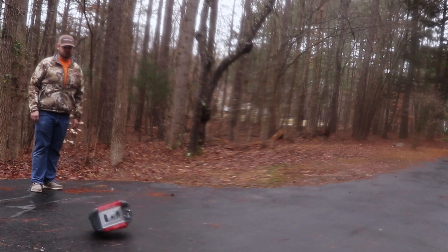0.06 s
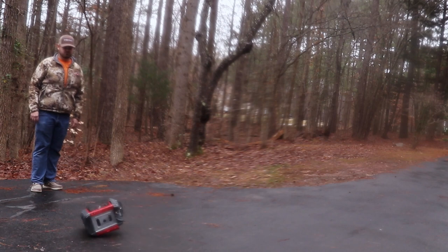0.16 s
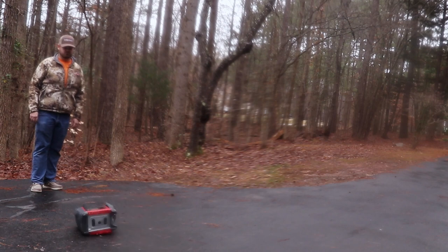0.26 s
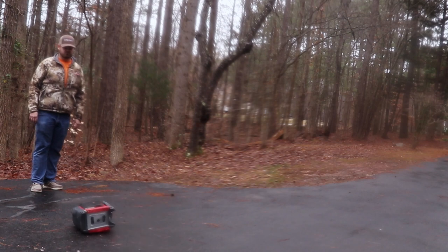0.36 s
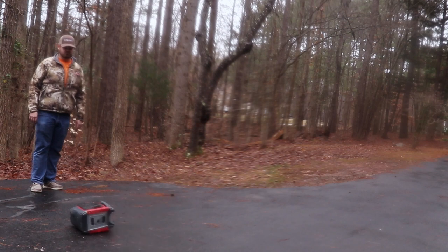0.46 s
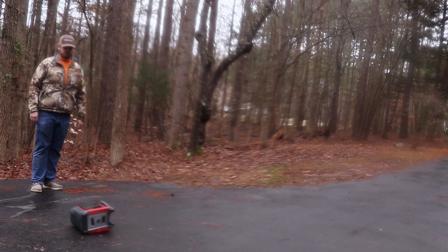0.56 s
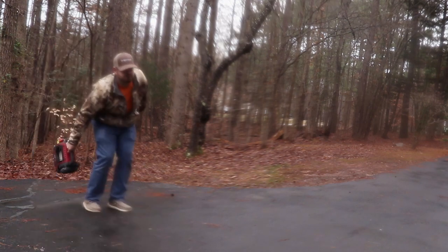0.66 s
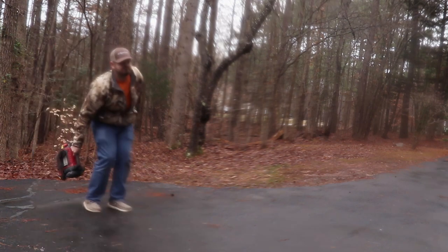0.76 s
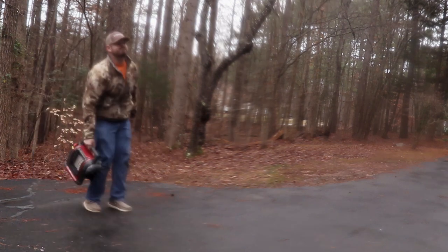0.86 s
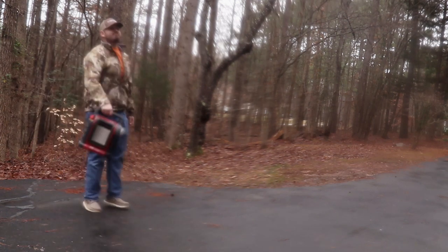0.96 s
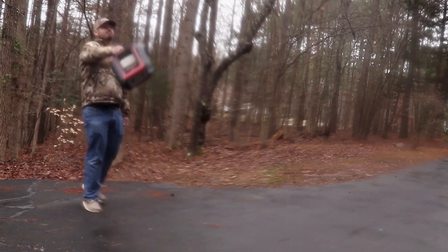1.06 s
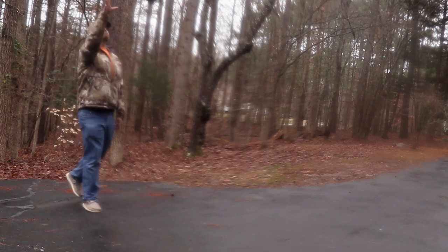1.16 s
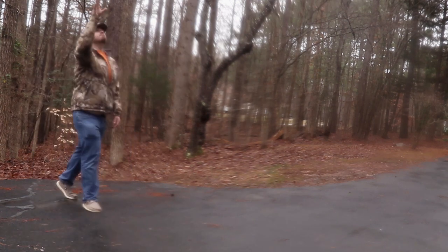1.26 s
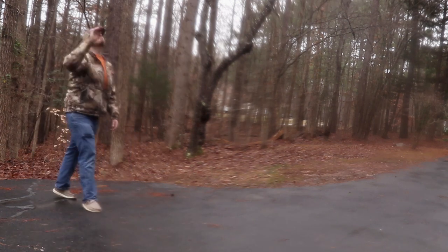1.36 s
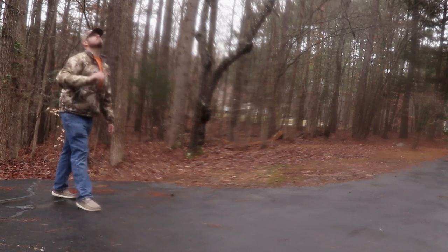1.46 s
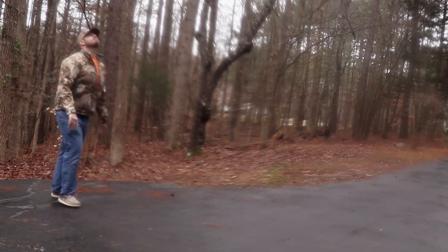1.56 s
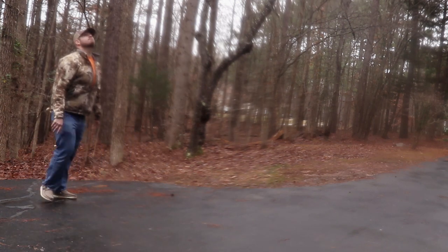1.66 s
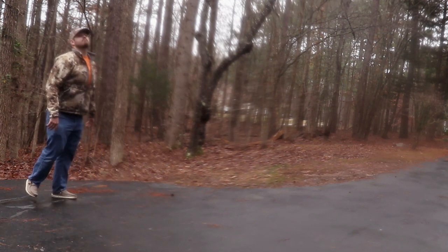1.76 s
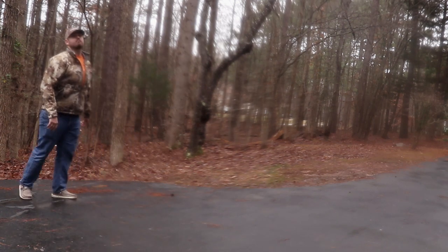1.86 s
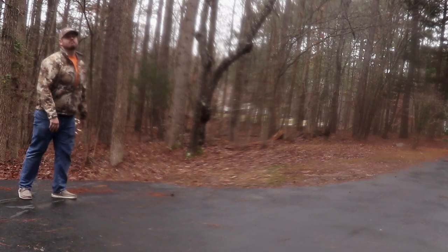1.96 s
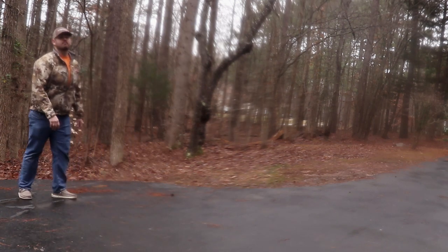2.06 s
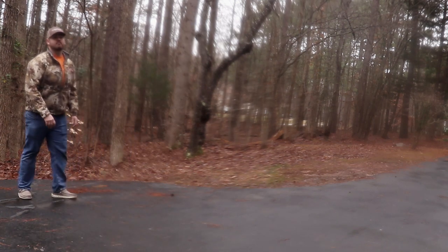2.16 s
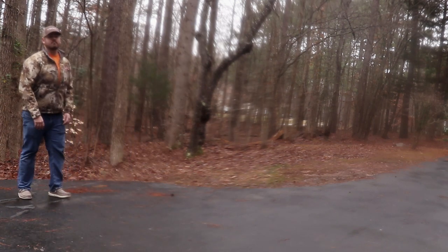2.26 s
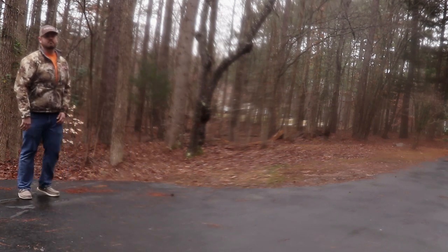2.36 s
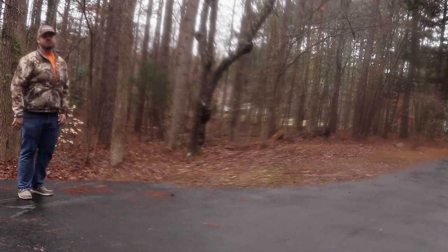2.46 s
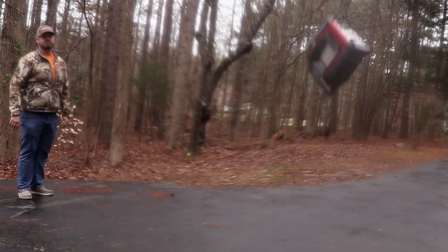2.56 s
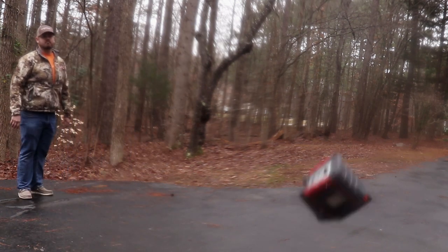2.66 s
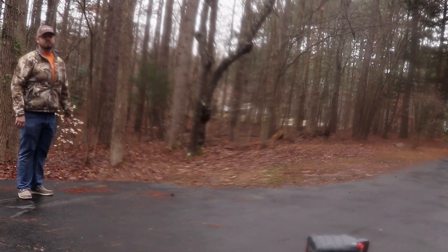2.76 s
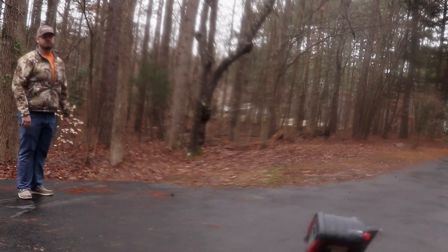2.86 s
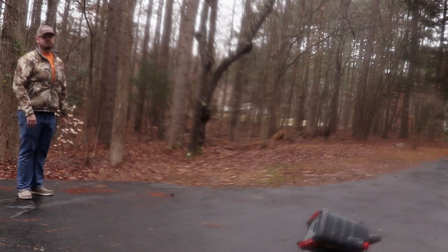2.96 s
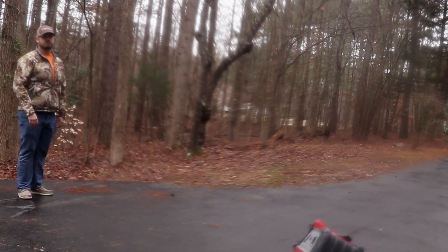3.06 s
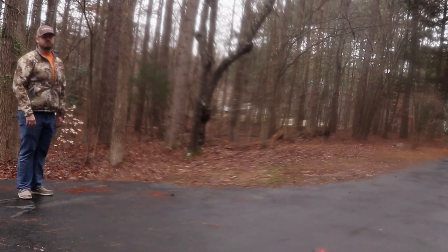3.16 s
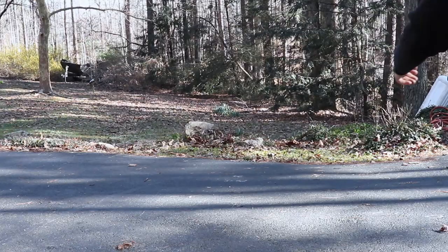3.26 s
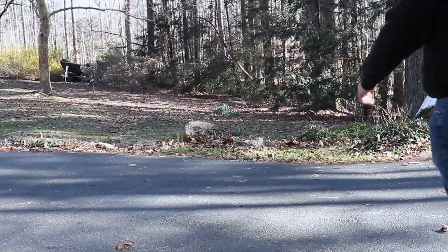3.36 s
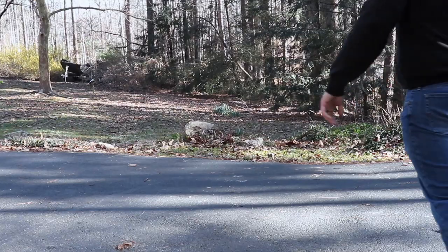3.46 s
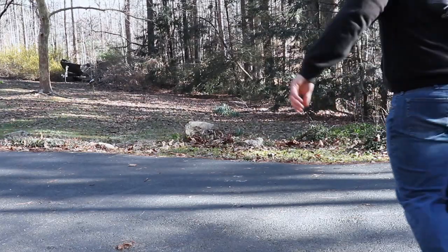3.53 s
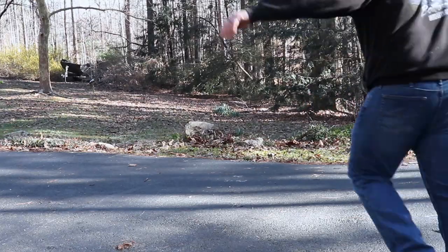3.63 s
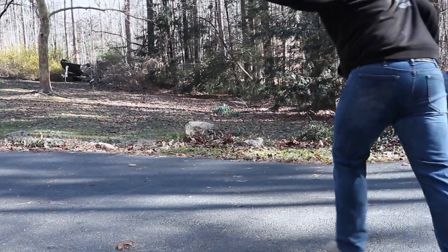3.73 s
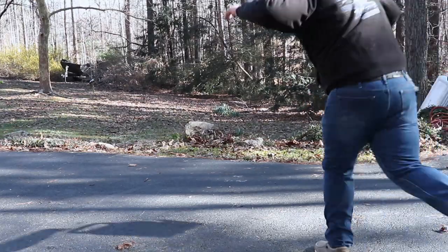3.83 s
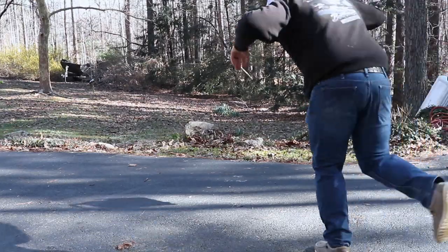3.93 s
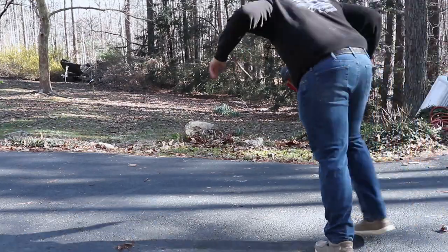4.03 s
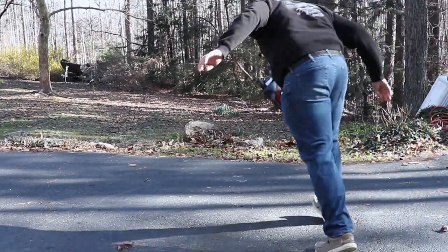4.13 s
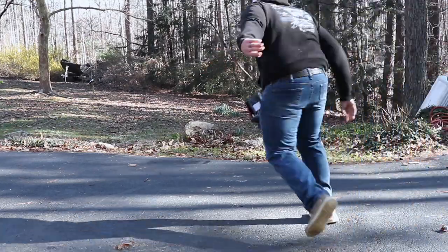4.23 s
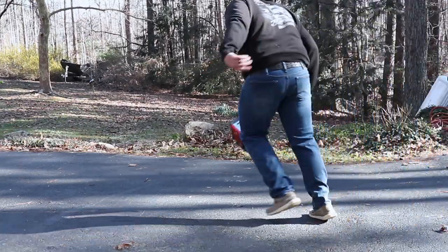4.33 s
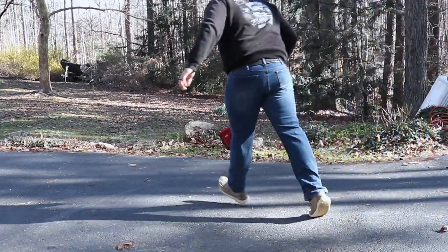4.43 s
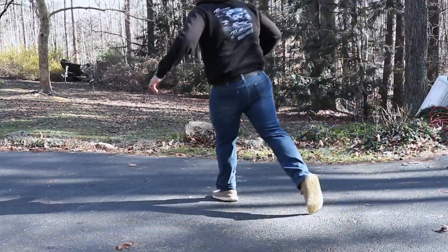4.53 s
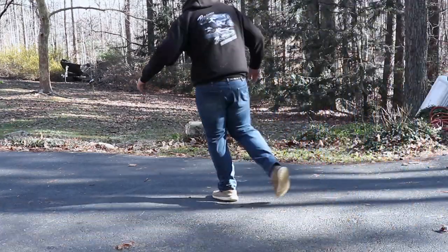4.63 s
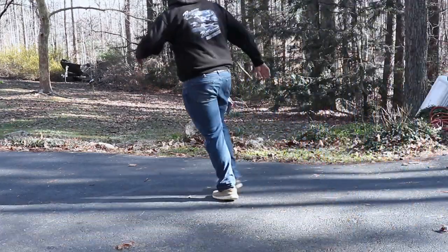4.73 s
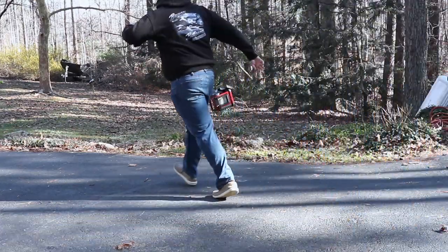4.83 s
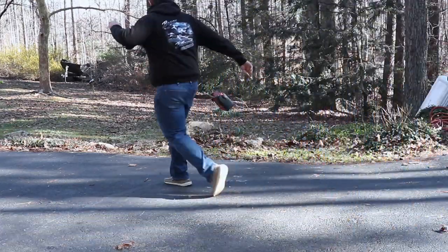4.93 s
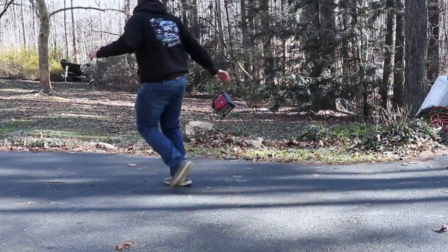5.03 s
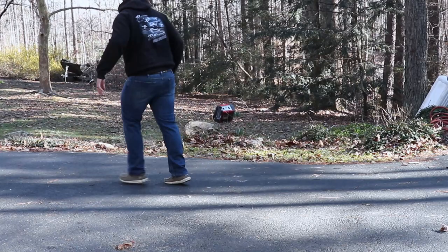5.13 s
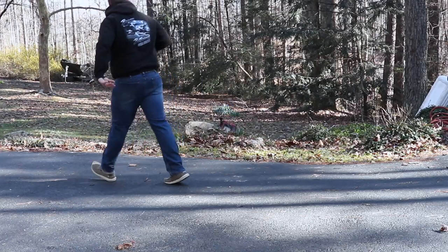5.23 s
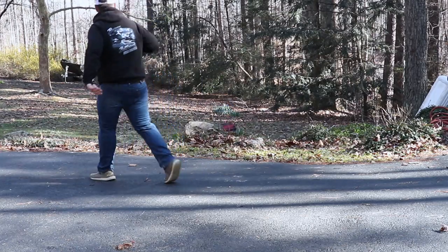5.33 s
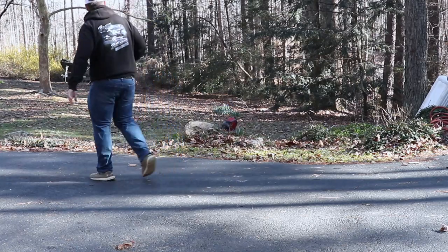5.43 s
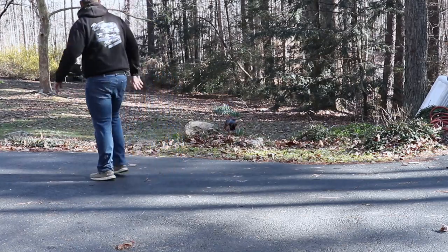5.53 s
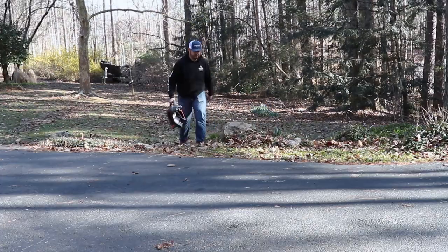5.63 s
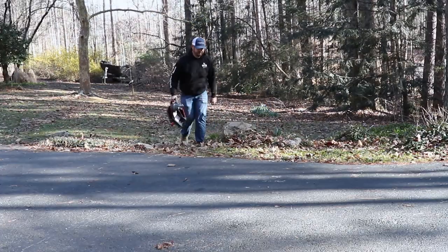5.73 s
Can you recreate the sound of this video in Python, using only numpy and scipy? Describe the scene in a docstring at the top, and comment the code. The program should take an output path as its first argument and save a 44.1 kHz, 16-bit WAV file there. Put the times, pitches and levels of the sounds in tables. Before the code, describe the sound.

Right at the start a sheet-metal heater slams onto asphalt and tumbles in sharp, tinny knocks and rattles, cut off abruptly at about 0.7 seconds. Lighter clanks follow around 1 second as it is picked up. A lull holds only faint shoe scuffs, soft wind thumps mostly on the left of the microphone, and distant traffic. At 2.8 seconds the heater lands with one loud, hard crash and a short rattling echo from the trees. At 3.3 seconds the faint background turns brighter, with a low rumble and slight rustle. From about 3.5 to 4.3 seconds shoes scuff and crack grit among small metal knocks. The heater hits hard at 4.5 seconds and again near 4.8, bouncing and ringing briefly. A last, softer and duller clatter comes around 5.4 seconds, followed by a low puff of wind.

```python
"""A rattle and a hard, tinny slam: a sheet-metal gas heater hits asphalt, thrown several times beside a wood.
Each knock drives a burst of contact noise through its damped panels as it bounces, rattles and skids.
The trees return a hiss of echoes, shoes scuff and crack grit, and wind thumps mainly the left mic.
Far traffic hums underneath; at 3.31 s it turns brighter, gains a low rumble, and a faint rustle joins."""
import sys
import numpy as np
from scipy import signal
from scipy.fft import rfft, irfft, next_fast_len
from scipy.io import wavfile
from scipy.ndimage import uniform_filter1d, map_coordinates

SR = 44100
rng = np.random.default_rng(int(sys.argv[2]) if len(sys.argv) > 2 else 0)


def digitize_waveform(pressure):
    """Quantize a signal to 16-bit integers and store it at the path in sys.argv[1].

    Rows of a 2-D input are taken as channels; values are limited to [-1, 1].
    """
    field = np.atleast_2d(pressure).T
    bounded = np.clip(field, -1, 1)
    quanta = np.round(bounded * 32767).astype(np.int16)
    wavfile.write(sys.argv[1], SR, quanta)


N = 255453
TIME = np.arange(N) / SR
CUT_S, SHIFT_S = 0.663, 3.31  # hard edits: the tails cut off abruptly; the background changes colour


def amp(db):
    """Decibels to gain."""
    return 10 ** (np.asarray(db) / 20)


def unit(x):
    """Scaled to rms 1."""
    return x / np.sqrt(np.mean(x ** 2) + 1e-20)


def along(points, hz):
    """Reads (f/Hz, value) points on a log frequency axis."""
    freqs, values = np.transpose(points)
    return np.interp(np.log(hz + 1), np.log(freqs + 1), values)


def automation(points):
    """Reads (t/s, value) points at every sample."""
    return np.interp(TIME, *np.transpose(points))


def wobble(rate):
    """A smooth random curve, rate knots a second."""
    return map_coordinates(rng.standard_normal(int(N * rate / SR) + 4), [TIME * rate])


def filtered(x, response):
    """x through a complex frequency response."""
    size = next_fast_len(x.shape[-1] + 2048)
    return irfft(rfft(x, size) * response(np.fft.rfftfreq(size, 1 / SR)), size)[..., :x.shape[-1]]


def resonance(hz, centre_hz, width_hz):
    """One damped mode, gain 1 at its centre."""
    return 1j * hz * width_hz / (centre_hz ** 2 - hz * hz + 1j * hz * width_hz)


# Stereo image of scattered sound: f/Hz, left-right correlation
DIFFUSE_IMAGE = [(60, 0.33), (290, 0.35), (640, 0.94), (1400, 0.25), (3100, 0.035), (15000, 0.14)]
def noise_bed(spectrum, patchy_db, image=DIFFUSE_IMAGE):
    """Stereo noise of rms 1, mottled with patches of random gain in time and frequency."""
    def mid_side_eq(hz):
        angle = np.arccos(np.clip(along(image, hz), -1, 1)) / 2
        return amp(along(spectrum, hz)) * [np.cos(angle), np.sin(angle)]
    cells = signal.stft(rng.standard_normal((2, N + SR // 10)), nperseg=256)[2]
    patches = uniform_filter1d(uniform_filter1d(rng.standard_normal(cells.shape[1:]), 4, 0), 6, 1)
    mottled = signal.istft(cells * amp(patchy_db * unit(patches)), nperseg=256)[1][:, :N]
    mid, side = filtered(mottled, mid_side_eq)
    return unit(np.array([mid + side, mid - side]))


# Panel modes of the heater: f/Hz, width/Hz, level/dB
PANEL_MODES = [(470, 70, -7), (900, 150, -1), (1150, 90, -9), (1620, 100, -6), (1930, 120, -2),
               (2550, 120, -7), (3050, 130, -2), (3310, 70, -5), (3750, 90, -8), (4220, 80, -6)]
def casing(hz, direct_db, scatter_db):
    """Sheet-metal colour: panel modes beside a direct path, their strengths randomised by scatter_db."""
    return amp(direct_db) + sum(
        (-1) ** k * amp(db + scatter_db * rng.standard_normal()) * resonance(hz, centre, width)
        for k, (centre, width, db) in enumerate(PANEL_MODES))


# Rattle and echo tails; the slow rises after the hardest hits stand for the recorder's gain recovering:
# t/s, rise/s, hold/s, fade/(dB/s), rattle level/dB, hiss over rattle/dB, drone over rattle/dB
TAILS = [(-0.02, 0.013, 0.0, 65, -48, -11, -32), (0.094, 0.27, 0.18, 266, -52, -7, -10),
         (0.99, 0.015, 0.0, 31, -73.5, -4, 8), (2.861, 0.27, 0, 65, -47, -10, -34),
         (3.297, 0.02, 0, 41.5, -77.5, 11, 0), (3.744, 0.15, 0.031, 26, -61.5, 3, -2),
         (4.505, 0.035, 0.045, 90, -54.5, 2.5, 2), (4.615, 0.016, 0, 70, -56, 3.5, 5),
         (4.752, 0.0073, 0.14, 79, -51.5, -2.5, -2), (5.383, 0.062, 0.082, 84, -60, 10.5, 0.5)]
def tail_envelopes():
    """Gains of rattle, hiss and drone: the level comes up, holds and fades, the hiss fastest."""
    power = np.zeros((3, N))
    for start, rise, hold, fade, db, hiss_db, drone_db in TAILS:
        level_db = db - 9.5 * np.clip(1 - (TIME - start) / rise, 0, 1)
        fall_db = fade * np.maximum(TIME - start - rise - hold, 0)
        stop = min(end for end in (CUT_S, SHIFT_S, np.inf) if end >= start + rise)
        gate = (TIME >= start) & (TIME < stop)
        power += gate * amp([level_db - fall_db,
                             level_db + hiss_db - 1.4 * fall_db,
                             level_db + drone_db - fall_db]) ** 2
    return np.sqrt(power)


# Tone of the rattle ahead of the panels: f/Hz, level/dB
RATTLE_EQ = [(450, -32.5), (800, 3), (1300, -2.5), (2500, 0.5), (4000, -2), (7000, -9.5), (11000, -37.5),
             (16000, -60.5)]
def rattle(gain):
    """Loose parts chatter: noise ringing through the casing."""
    chatter = noise_bed(RATTLE_EQ, patchy_db=0.8)
    return gain * unit(filtered(chatter, lambda hz: casing(hz, direct_db=-6, scatter_db=0)))


# Tone of the wood's hiss: f/Hz, level/dB
TREE_EQ = [(2940, -6), (5000, -6.5), (6910, -9), (9350, -15), (12900, -25), (15800, -50), (16400, -63)]
def trees(echo_gain):
    """Leaves and trunks scatter a bright echo; a faint rustle joins at SHIFT_S."""
    rustle_gain = amp(-74.5) * (TIME > SHIFT_S)
    return np.hypot(echo_gain, rustle_gain) * noise_bed(TREE_EQ, patchy_db=0.8)


# Tone of the drone before and after SHIFT_S: f/Hz, level/dB
DARK_DRONE_EQ = [(150, -37.5), (250, -10), (417, -2.5), (472, -8.5), (875, -7), (1080, -13), (2500, -29),
                 (3250, -60.5), (5500, -120)]
BRIGHT_DRONE_EQ = [(150, -38), (250, -2), (510, -7.5), (655, -7.5), (1440, -1), (2060, -14), (2500, -8.5),
                   (3250, -25), (5500, -120)]
# Fader ride of the far traffic: t/s, level/dB
TRAFFIC_RIDE = [(0.0, -66.5), (0.9, -73), (1.5, -80.5), (2.0, -71.5), (2.5, -84), (3.3, -62), (3.32, -65.5),
                (4.2, -64), (5.1, -59), (5.79, -68.5)]
def traffic(echo_gain):
    """One low drone carries both the far traffic and the dull part of the echo."""
    dark = noise_bed(DARK_DRONE_EQ, patchy_db=2)
    bright = noise_bed(BRIGHT_DRONE_EQ, patchy_db=1.2)
    return np.hypot(echo_gain, amp(automation(TRAFFIC_RIDE))) * np.where(TIME < SHIFT_S, dark, bright)


# Strength of the gusts: t/s, level/dB
GUST_RIDE = [(0.0, -75), (0.45, -71.5), (0.9, -72.5), (1.1, -87.5), (1.52, -100), (1.6, -76.5),
             (1.95, -81.5), (2.1, -72.5), (2.4, -76), (2.65, -70), (3.05, -71.5), (3.4, -60), (3.5, -88),
             (3.8, -91), (3.9, -62), (4.4, -81), (4.9, -70), (5.4, -68), (5.56, -65), (5.64, -54),
             (5.73, -69.5), (5.79, -84)]
# Tone of the wind's deep rumble and of the flutter above it: f/Hz, level/dB
RUMBLE_EQ = [(15, -43), (35, -26), (52, 5.5), (110, 14), (160, -45.5)]
FLUTTER_EQ = [(80, -29.5), (130, 5.5), (220, 1.5), (320, -8.5), (450, -37.5)]
def wind():
    """Lumpy pressure, strongest on the exposed left mic; a rumble of far traffic joins at SHIFT_S."""
    gust_db = automation(GUST_RIDE)
    flutter_db = -74.5 + 0.6 * (gust_db - gust_db.mean()) + 0.83 * wobble(10)
    traffic_gain = amp(-70) * (TIME > SHIFT_S)  # shares the flutter's band
    flutter_gain = np.hypot(amp(flutter_db), traffic_gain)
    lumps = amp(3 * wobble(25))
    rumble = amp(gust_db) * noise_bed(RUMBLE_EQ, patchy_db=1.5, image=[(30, 0.6)])
    flutter = flutter_gain * noise_bed(FLUTTER_EQ, patchy_db=1.5, image=[(30, 0.85)])
    return lumps * (rumble + flutter) * amp([[-1.5], [-6]])


def mic_hiss():
    """The faint steady hiss of the microphone amplifiers."""
    eq = [(300, -37), (1500, 8), (5000, -1.5), (16000, -17.5)]
    return amp(-86.5) * noise_bed(eq, patchy_db=-1.5, image=[(1000, 0.1)])


# Pan of the action: t/s, left lag/samples, left over right/dB
PAN_PATH = [(0, -3, -1), (1.201, -2.5, 2.5), (1.7, -1.5, 5), (1.76, 6.5, 0), (2.2, 8, -3.5), (2.3, -2.5, 3),
            (2.7, 0, 3.5), (2.8, 0.5, -2.5), (3.3, 6, -5), (3.8, 6, -6), (4.1, -1, -2.5), (4.5, 0, -3),
            (5.79, 0.36, -3)]
def place(out, start, sound):
    """Mixes a sound in, panned by delay and level; one begun before CUT_S is cut off there."""
    times, lags, lefts_db = np.transpose(PAN_PATH)
    side, margin = np.array([[1], [-1]]), 8
    delay_s = side / 2 * np.interp(start, times, lags) / SR
    gain = amp(side / 2 * np.interp(start, times, lefts_db))
    padded = np.pad(sound, ((0, 0), (margin, margin)))
    panned = gain * filtered(padded, lambda hz: np.exp(-2j * np.pi * hz * delay_s))
    if start < CUT_S:
        panned = panned[:, :round((CUT_S - start) * SR)]
    out[:, round(start * SR) - margin:][:, :panned.shape[1]] += panned


def contact(size, treble_db, body_db, band_hz, lift_db, spread, top_db):
    """Contact noise with one band lifted; the mics differ only at short wavelengths."""
    shared, separate = rng.standard_normal(size), rng.standard_normal((2, size))
    eq = [(60, body_db - 28), (200, body_db), (500, body_db + 10.5), (1000, 1.5), (3500, -4.5),
          (8000, treble_db + 8), (16000, 1.37 * treble_db + top_db)]
    bell = lambda hz: 1 + amp(lift_db) * np.exp(-np.log((hz + 1) / band_hz) ** 2 / 0.05)
    colour = lambda hz: amp(along(eq, hz)) * bell(hz)
    width = filtered(separate, lambda hz: colour(hz) * spread * hz / (hz + 1500))
    return unit(filtered(shared, colour) + width)


def shaped(noise, envelope, steepness):
    """An envelope on noise, raised to steepness above 5 kHz: over 1 shortens the treble, under 1 extends."""
    low = signal.sosfilt(signal.butter(2, 5000, fs=SR, output="sos"), noise)
    return envelope * low + envelope ** steepness * (noise - low)


def puff(t, hz):
    """One soft cycle of pressure."""
    return np.sin(2 * np.pi * hz * t) * np.exp(-(hz * t - 0.9) ** 2 / 0.41)


# Hits of the casing on asphalt: t/s, level/dB, treble/dB, thud/dB, panel f/Hz, ring/dB, burst t60/s
KNOCKS = [(0.08, -39, -32, -13, 810, 9, 0.053), (0.097, -14.5, -24, -16, 1520, -13, 0.046),
          (0.103, -42, -29, -21, 1110, 27, 0.065), (0.182, -40.5, -27.5, -15.5, 880, 4, 0.061),
          (0.186, -24, -24.5, -10, 920, 11.5, 0.06), (0.226, -26.5, -19, -11, 947, 11, 0.15),
          (0.29, -42.5, -11.5, -11, 514, 12, 0.23), (0.343, -38, -15.5, -13, 887, 11, 0.072),
          (0.368, -29.5, -16, -15, 862, 8, 0.3), (0.419, -37, -13, -32, 1670, 17, 0.4),
          (0.51, -45.5, -13.5, -13, 410, 17, 0.17), (0.543, -30.5, -21.5, -6, 1380, 14, 0.29),
          (0.974, -45, -22, -3, 440, 1, 0.2), (0.986, -29.5, -18.5, -37, 1770, 15, 0.19),
          (1.03, -36, -24.5, -19.5, 1480, 17, 0.18), (1.105, -46, -45, -12, 827, 18, 0.33),
          (1.175, -45, -56, -10, 1020, 10, 0.22), (1.195, -43.5, -33, -23, 913, 18, 0.072),
          (1.225, -37.5, -37, -13.5, 871, 20, 0.14), (1.953, -43.5, -45, -7.5, 812, 14, 0.068),
          (2.843, -13, -15.5, -7.5, 944, 6, 0.038), (2.851, -19.5, -17, -15, 1900, -2, 0.069),
          (3.595, -34.5, -21, -3, 1016, -5, 0.02), (3.854, -35.5, -21, -30, 1297, 28, 0.025),
          (3.911, -32.5, -14, 11, 1274, 14.5, 0.038), (3.945, -26.5, -12.5, -18, 3840, -2, 0.076),
          (4.06, -47, -29, -5, 742, 24.5, 0.045), (4.495, -22, -14.5, -9.5, 2340, -6, 0.067),
          (4.506, -14, -39, -12.5, 1620, 11, 0.032), (4.622, -32.5, -26, 1, 582, 8, 0.06),
          (4.644, -35, -28.5, 0, 478, 11, 0.11), (4.732, -34.5, -14, -5, 2830, 16, 0.59),
          (4.761, -13, -23, -7.5, 396, -2, 0.056), (4.807, -31.5, -21.5, -6, 2000, 18, 0.066),
          (4.829, -30, -31, -34, 1210, 8, 0.04), (5.362, -34.5, -25, 0.5, 386, 13.5, 0.21),
          (5.385, -28.5, -26, 0.5, 469, 12, 0.17), (5.414, -24, -18, -1, 2390, 9, 0.24),
          (5.443, -36.5, -19, -20, 1000, 21.5, 0.17), (5.459, -34, -25, -8, 523, 11.5, 0.17)]
def heater_knocks():
    """Each hit is a crushing burst through the damped panels, the struck panel's ring and a dull thud."""
    out, t = np.zeros((2, N + SR)), np.arange(SR // 5) / SR
    attack = 1 - np.exp(-t / 0.00077)
    released_s = np.maximum(t - 0.004, 0)  # pressed on the asphalt for 4 ms
    shiver = amp(-22.5 - 60 * t / 0.5) * (1 - t / t[-1])  # the shell's faint tail
    for start, db, treble_db, thud_db, panel_hz, ring_db, t60 in KNOCKS:
        envelope = attack * (amp(-60 * released_s / (t60 + 0.0021)) + shiver)
        noise = contact(len(t), treble_db, thud_db, panel_hz, lift_db=-5.5, spread=0.74, top_db=4)
        burst = shaped(noise, envelope, steepness=0.87)
        clang = filtered(burst, lambda hz: casing(hz, direct_db=-1, scatter_db=3))
        ring_gain = attack * amp(ring_db - 8 - 60 * t * panel_hz / 45)  # 60 dB down in 45 cycles
        ring = ring_gain * np.sin(2 * np.pi * panel_hz * t)
        thud = amp(thud_db - 7.5) * puff(t, hz=191)
        place(out, start, amp(db - 12.5) * (clang + ring + thud))
    return out[:, :N]


# Shoes and casing dragged on asphalt: t/s, level/dB, treble/dB, body/dB, band f/Hz, lift/dB, length/s
STROKES = [(1.56, -57, -14, -23, 2480, -28, 0.15), (1.77, -53.5, -68, -6.5, 1000, 1, 0.075),
           (2.319, -62, -15, -21.5, 3900, -12.5, 0.05), (2.44, -54, -4, -10, 3960, 2, .19),
           (3.292, -47, -8.5, -6, 7000, -11, 0.029), (3.559, -50.5, -21, -8, 4770, -17, 0.033),
           (3.606, -51.5, -26, -7, 4940, -20, 0.03), (3.73, -46.5, -6, -10, 3800, 11, 0.17),
           (3.804, -42.5, -10.5, -56, 6760, -28, 0.049), (3.825, -33.5, -20, -27, 1440, -2, 0.046),
           (3.88, -35.5, -15.5, -9, 3500, 5, 0.03), (4.144, -51.5, -15, -24, 3540, 10, 0.062),
           (4.25, -46.5, -25, -6, 3800, -2, 0.063), (4.471, -34, -13, -22, 5500, 3, 0.076),
           (5.6, -54.5, -10, -6, 4100, -25, 0.14)]
def scuffs():
    """Strokes of rough friction: noise broken into grains, swelling and fading."""
    out, t = np.zeros((2, N + SR)), np.arange(SR // 5) / SR
    for start, db, treble_db, body_db, band_hz, lift_db, length in STROKES:
        swell = np.sin(np.pi * np.clip(t / length, 0, 1)) ** 1.3
        grains = amp(2.86 * unit(uniform_filter1d(rng.standard_normal(len(t)), size=60)))
        friction = contact(len(t), treble_db, body_db, band_hz, lift_db, spread=0.7, top_db=-6)
        place(out, start, amp(db - 8) * grains * shaped(friction, swell, steepness=1.7))
    return out[:, :N]


# The loudest cracks of grit: t/s, level/dB, f/Hz
GRIT_CRACKS = [(1.5667, -50, 3610), (2.546, -39, 4800), (3.1016, -44, 8830), (3.332, -44.5, 5400),
               (3.3623, -45.5, 8100), (3.3869, -48, 8400), (3.485, -49.5, 8250), (3.773, -51.5, 4340),
               (3.8011, -32, 4430), (3.8193, -23.5, 7400), (3.8394, -42, 6830), (3.9794, -43, 8040),
               (4.0255, -35, 6700), (4.046, -38, 6200), (4.0734, -37, 6360), (4.1525, -38, 3540),
               (4.1611, -32.5, 4550), (4.1644, -30, 2360), (4.181, -32.5, 3100), (4.2586, -25.5, 3930),
               (4.265, -26.5, 4350), (4.277, -34.5, 4620), (4.286, -35, 3130), (4.2938, -35, 2880),
               (4.475, -32, 7150), (5.0194, -51, 7940), (5.291, -62, 9000), (5.321, -58, 7840)]
def grit():
    """Each grain cracks in about two cycles, with a faint spray; fine ones crunch at random underfoot."""
    out, t = np.zeros((2, N + SR)), np.arange(SR // 50) / SR
    when, size, pitch = rng.random((30, 3)).T
    fine = zip(np.interp(when, [0, 1], (3.12, 4.3)), -70 + 12 * size, 7500 * 2 ** (pitch - 0.5))
    for start, db, hz in GRIT_CRACKS + list(fine):
        crack = np.sin(2 * np.pi * hz * t) * (hz * t) ** 2 * np.exp(1 - hz * t * 2.58)
        burst = amp(-9.5 - 60 * t / 0.014) * rng.standard_normal((2, len(t)))
        spray = filtered(burst, lambda f: resonance(f, hz, 0.53 * hz) ** 2)
        place(out, start, amp(db + 7) * (crack + spray))
    return out[:, :N]


# The hardest puffs of the gusts: t/s, level/dB, f/Hz
GUST_PUFFS = [(1.662, -54.5, 163), (1.706, -51.5, 157), (1.883, -51, 149), (2.021, -55, 148),
              (2.09, -48.5, 115), (2.112, -50, 114), (2.13, -52, 144), (2.16, -51, 137),
              (2.238, -55.5, 124), (2.288, -49.5, 146), (2.341, -59.5, 114), (2.483, -58.5, 101),
              (2.639, -57, 118), (2.754, -49.5, 116), (3.113, -41.5, 140), (3.162, -47, 100),
              (3.183, -44, 122), (3.252, -43.5, 101)]
def wind_thumps():
    """Single pressure pulses bump the mics, mostly the left."""
    out, t = np.zeros(N + SR), np.arange(SR // 10) / SR
    for start, db, hz in GUST_PUFFS:
        out[round(start * SR):][:len(t)] += amp(db - 3.5) * puff(t, hz)
    return out[:N] * amp([[1.5], [-8]])


def scene():
    """The stereo mix: hits and footwork over a shaking wash, wind and hiss."""
    foley = heater_knocks() + scuffs() + grit()
    rattle_gain, hiss_gain, drone_gain = tail_envelopes()
    shake = amp(0.9 * wobble(60))  # loose parts knock irregularly
    wash = shake * (rattle(rattle_gain) + trees(hiss_gain) + traffic(drone_gain))
    return foley + wash + wind() + wind_thumps() + mic_hiss()


def duck_bass(x, split_hz=195, threshold_db=-53, db_per_db=0.76, delay_s=0.028, release_s=0.044):
    """The bass dips just after a loud peak in the band above it, then recovers."""
    bass = filtered(x, lambda hz: 1 / (1 + (hz / split_hz) ** 4))
    upper = x - bass
    pole = np.exp(-1 / (release_s * SR))
    power = signal.lfilter([1 - pole], [1, -pole], np.mean(upper ** 2, 0))
    over_db = np.maximum(10 * np.log10(power + 1e-12) - threshold_db, 0)
    return upper + bass * amp(-db_per_db * np.interp(TIME - delay_s, TIME, over_db))


# Imbalance of the two mics: f/Hz, left over right/dB
LEFT_TILT = [(60, 8.5), (200, 9), (400, 11), (700, 11.5), (1300, 7), (2400, 3), (8000, -0.5), (15000, 0)]
def record(dry):
    """Lows and mids lean left, the bass ducks, peaks soft-clip and the top ends near 15.9 kHz."""
    tilted = filtered(dry, lambda hz: amp(along(LEFT_TILT, hz) * np.array([[0.5], [-0.5]])))
    ducked = duck_bass(tilted)
    clipped = ducked / (1 + np.abs(ducked / 0.115) ** 4) ** (1 / 4)
    return filtered(clipped, lambda hz: np.clip((15900 - hz) / 250 + 0.5, 0, 1) ** 2)


dry = scene()
out = record(dry)
digitize_waveform(out)
```